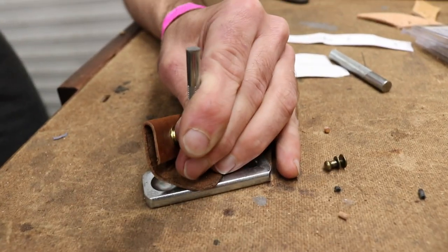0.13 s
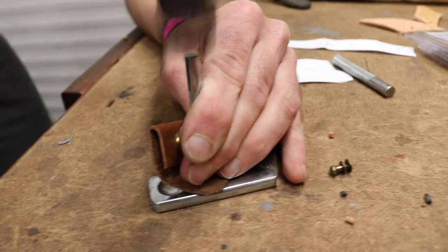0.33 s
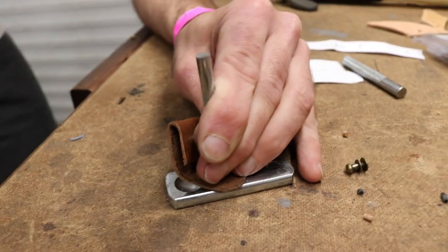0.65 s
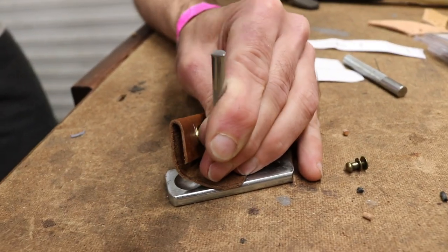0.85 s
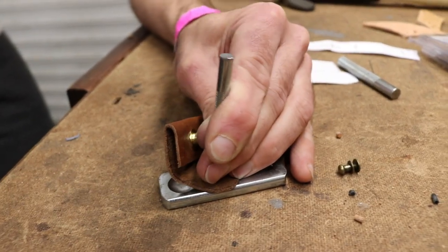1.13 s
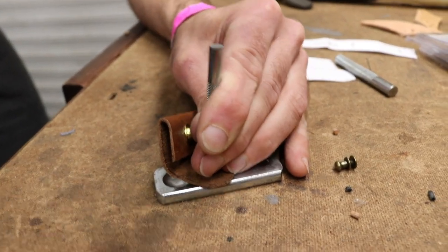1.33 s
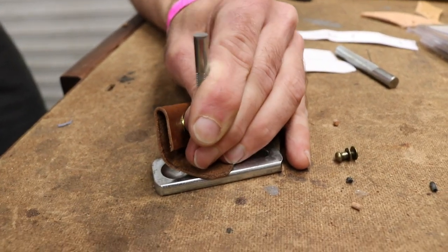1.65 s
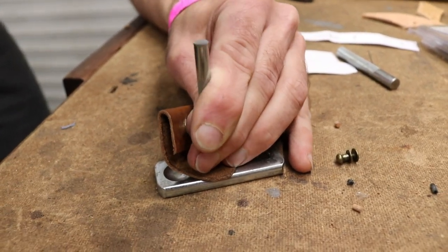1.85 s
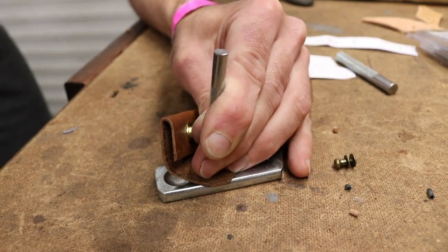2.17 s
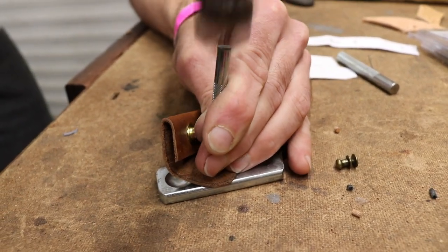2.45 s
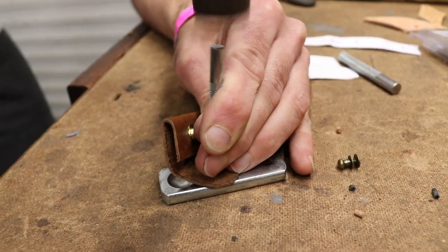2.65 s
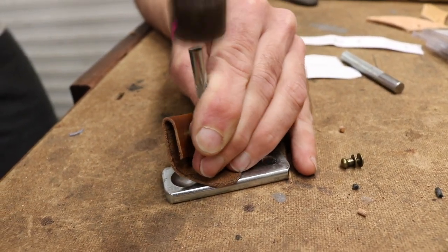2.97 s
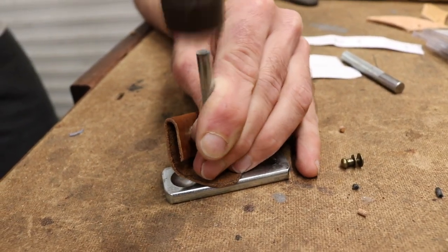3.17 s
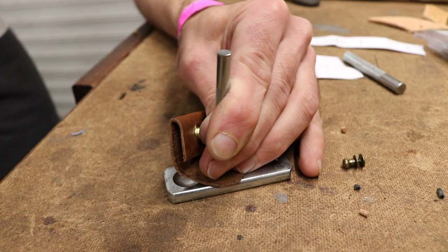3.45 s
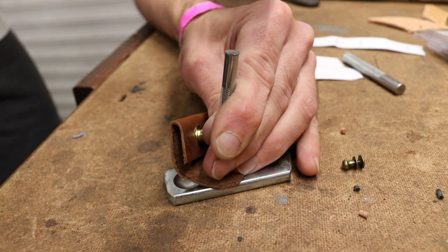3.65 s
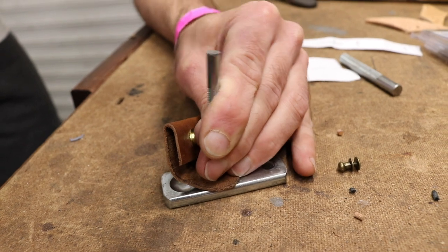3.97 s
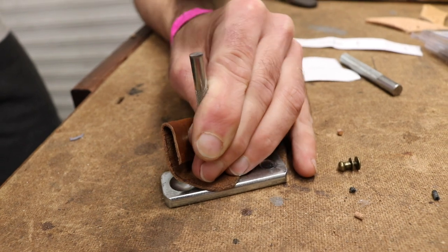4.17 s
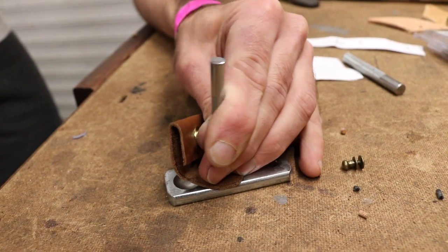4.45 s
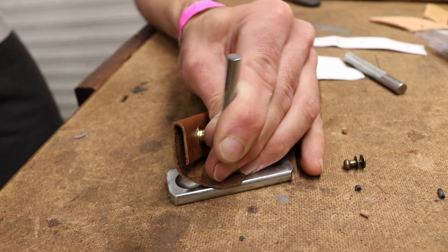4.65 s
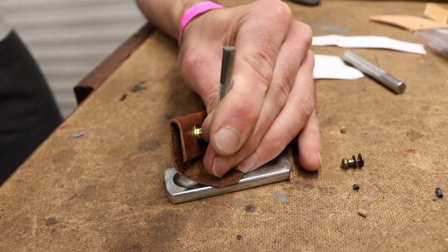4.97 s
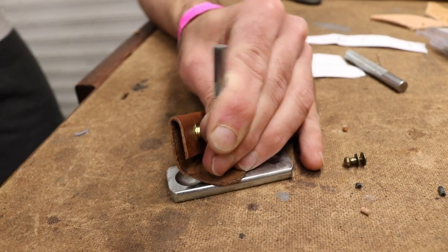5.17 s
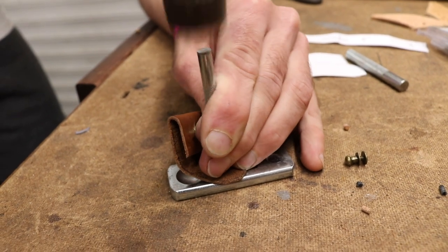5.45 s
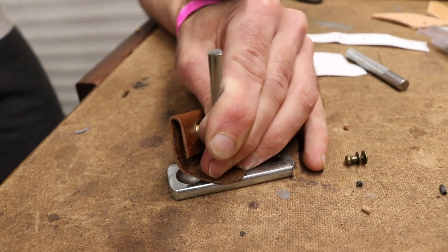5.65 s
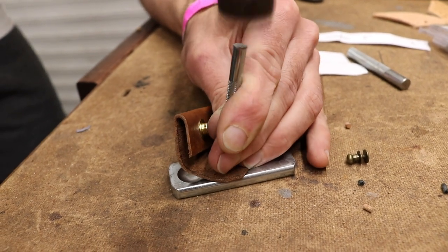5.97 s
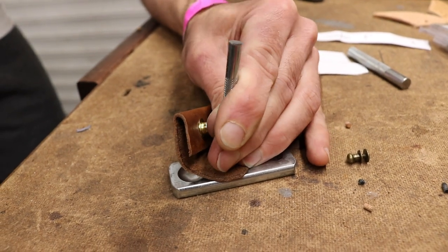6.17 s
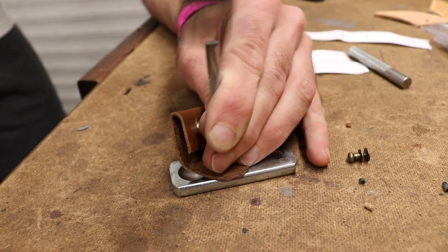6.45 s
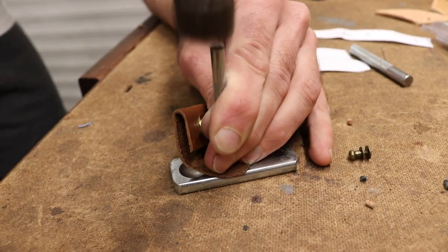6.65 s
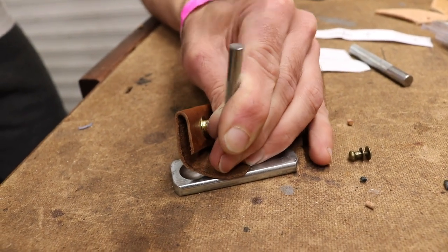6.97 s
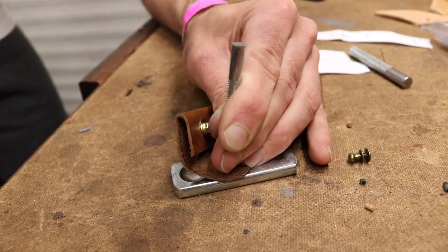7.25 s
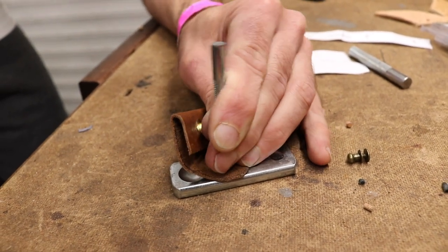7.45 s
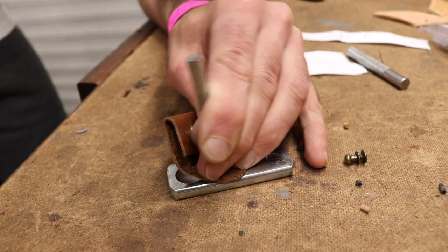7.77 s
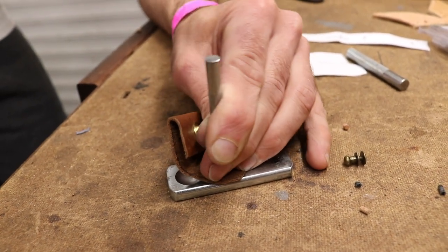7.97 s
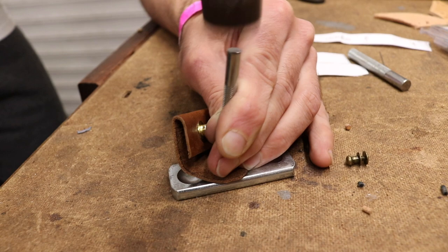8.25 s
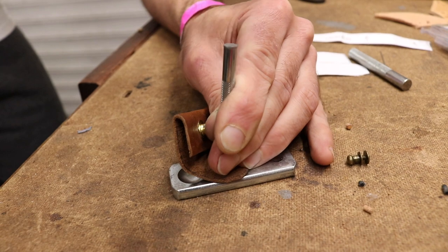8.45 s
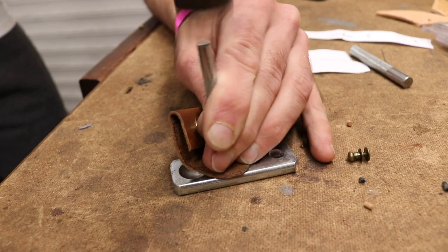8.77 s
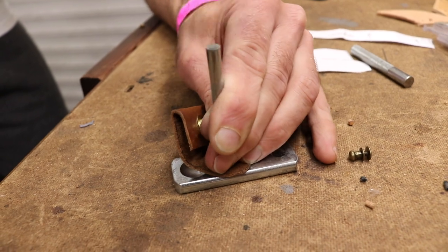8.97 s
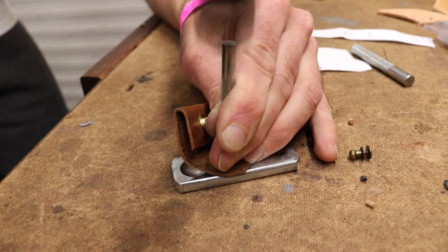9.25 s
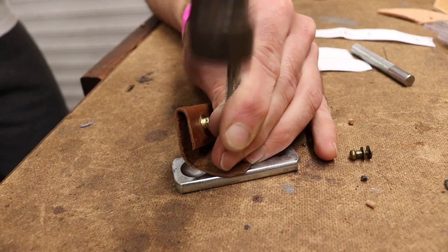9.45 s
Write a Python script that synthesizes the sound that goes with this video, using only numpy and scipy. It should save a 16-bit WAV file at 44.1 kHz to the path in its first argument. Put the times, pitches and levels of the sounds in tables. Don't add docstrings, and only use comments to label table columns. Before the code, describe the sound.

Continuous fast metal tapping, regular as a machine but each blow slightly different in brightness. Steel clicks on steel, a brass fastener snaps, the small anvil clacks and the fibreboard bench answers with a dry hollow thud. The microphone is very near and overloads a touch on strong blows. A small room adds a brief tail; faint low hum and hiss at the start sink away within a few seconds.

```python
import sys
import numpy as np
from scipy import signal
from scipy.fft import rfft, irfft
from scipy.io import wavfile

SR = 44100
rng = np.random.default_rng(int(sys.argv[2]) if len(sys.argv) > 2 else 0)


def to_wav(sig):
    pcm = np.clip(np.atleast_2d(sig), -1, 1) * 32767
    pcm = np.round(pcm).astype(np.int16)
    wavfile.write(sys.argv[1], SR, pcm.T)


def attenuation_scalar(level_db):
    decades = np.asarray(level_db, float) / 20
    return 10 ** decades


N = 424241


def taps():
    # [t/s, crispness of the blow, lean away, lean sideways]
    first_taps = [(0.0551, 1.5, -0.094, 1.8), (0.2339, 1.5, -0.79, 1.1), (0.4142, 1.5, -0.62, 0.81),
                  (0.5903, 1.5, 0.32, -1.3), (0.7637, 1.5, -0.56, -1.6), (0.9518, 2, 0.86, -2.6),
                  (1.1335, 1, 1.8, -0.35), (1.3044, 0.8, 0.65, -0.033), (1.4823, 0.7, -0.45, 0.38),
                  (1.6537, 1, -2.06, -1.1), (1.8356, 0.7, 0.017, -1.8), (2.0062, 0.7, -0.38, -2),
                  (2.188, 0.1, 0.99, 0.33), (2.3614, 0, 1.05, 0.6), (2.5318, 0.04, 0.76, 1.6),
                  (2.6968, 0, -0.55, 0.86), (2.8693, 0.5, -1.6, -0.46), (3.044, -0.7, 0.36, 0.063),
                  (3.2205, 0, -0.14, -1.9), (3.4015, 0.05, 1.5, -1.2), (3.5705, -0.26, 0.51, 0.19),
                  (3.7487, -0.2, 0.48, 0.75), (3.921, 0, -0.21, 0.66), (4.097, -0.16, -1.1, -0.47),
                  (4.2654, -0.6, -0.45, -0.29), (4.4373, -0.4, 1.3, 0.73), (4.6143, -0.7, 1.85, 0.85)]
    later_taps = [(4.7902, -0.48, 1.4, 1.4), (4.9653, -0.28, 0.7, 0.5), (5.1368, -0.17, -1.0, -0.6),
                  (5.3104, -0.4, -0.5, 0.5), (5.4901, -0.83, 0.5, 0.3), (5.6782, -0.032, 0.3, -1.6),
                  (5.8499, -0.3, 0, -0.1), (6.0193, 0.29, 0.7, 0), (6.1916, -0.2, 0.1, 1.3),
                  (6.3616, -0.41, -1.1, -1), (6.5368, -0.34, -0.5, 0.5), (6.7246, -0.69, 1.5, -1),
                  (6.8967, -0.75, 2.5, -0.3), (7.0747, 0.023, 1, -1.6), (7.2377, 0.034, 0.5, 0),
                  (7.4132, -0.35, -0.6, 1), (7.59, -0.34, -0.9, 0.5), (7.7609, -1.24, 1.3, 1.5),
                  (7.9411, -0.46, 0.7, -0.6), (8.127, -0.35, 0.1, -1), (8.2974, 0.1, 0.3, 0.4),
                  (8.4718, 0.12, -0.8, -0.65), (8.635, -0.73, -1, 0.3), (8.8083, -0.72, 0.1, 2),
                  (8.974, -0.88, 0.5, 2), (9.1517, -0.11, 0.5, 0.5), (9.3333, 0.63, -0.5, -0.7)]
    # [level/dB, dB per crispness, dB per lean away, dB per lean sideways]
    knock_law = (-16.5, 1, -0.11, 0)
    seat_law = (-15, -1, -1.4, 0.5)
    clack_law = (-17, -0.24, -4, 1.9)
    snap_law = (-11.5, 6.1, -2, -0.7)
    tick_law = (-17, 4, 1.98, 1.64)
    edge_law = (1, .3, -1.7, -2)
    # [f/Hz, Hz per crispness, Hz per lean away, Hz per lean sideways]
    spot_law = (9198.5, -58, -500, 349.5)
    # [f/Hz, level/dB, time to fall 60 dB/s, push 1 or pull -1]
    seat_modes = [(1424, -12, .05, -1), (1611, -12, .05, -1), (1701, -17, .05, -1), (1766, -4, .03, -1),
                  (1837, -14, .045, -1), (1962, -18, .045, -1), (2143, -9, .027, 1)]
    anvil_modes = [(2648, -9, .024, -1), (2790, -12, .02, -1), (2926, -7, .019, 1), (3049, -8, .018, 1),
                   (3352, -11, .016, 1), (3429, -16, .028, -1), (3717, -17, .023, 1), (4030, -13, .012, 1),
                   (4299, -11, .008, -1), (4496, -13, .007, -1)]
    # [f/Hz, level/dB]
    snap_colour = [(1500, -31), (2300, -14), (3600, 1.5), (4400, -1.5), (5400, -4), (7000, -34)]
    crisp_in_room = .1

    knocks, direct, spread = np.zeros((3, N))
    bench = knock()
    seat = mode_waves(seat_modes, .08)
    anvil = mode_waves(anvil_modes, .06)
    laws = np.array([knock_law, seat_law, clack_law, snap_law, tick_law, edge_law, spot_law])
    for s, crispness, *lean in first_taps + later_taps:
        blow_db, seat_db, clack_db, snap_db, tick_db, edge_db, tick_hz = laws @ [1, crispness, *lean]
        add(knocks, s, attenuation_scalar(blow_db) * ring(bench, .45))
        add(direct, s - .00026, attenuation_scalar(blow_db + seat_db - 2.6) * ring(seat, 1.5))
        add(direct, s - .00019, attenuation_scalar(blow_db + clack_db - 2.1) * ring(anvil, 2.1))
        snap = rattle(lambda f: read(snap_colour, f), 0.00025, 0.0011)
        add(direct, s - .0003, attenuation_scalar(blow_db + snap_db + 26) * snap)
        add(direct, s - .0007, attenuation_scalar(blow_db + tick_db - 0.14) * tick(tick_hz, edge_db))
        ping = punch(ringing(s))
        add(direct, s - .0003, ping)
        add(spread, s, attenuation_scalar(15) * ping)

        seat_db, clack_db, _, tick_db = laws[1:5] @ [1, crisp_in_room * crispness, *lean]
        room_colour = [
            (1000, 0.2 * clack_db - 4),
            (1800, 0.51 * seat_db - 3.5),
            (3500, 0.95 * clack_db - 2),
            (tick_hz - 1500, 0.4 * tick_db - 9.5),
            (tick_hz, 0.72 * tick_db - 1.5),
            (tick_hz + 1500, 0.13 * tick_db - 9),
            (14000, 0.23 * tick_db - 13.0),
        ]
        add(spread, s, attenuation_scalar(blow_db + 33.5) * rattle(lambda f: read(room_colour, f), 0.00025, .0016))
    return knocks, direct, spread


def tick(hz, edge_db, width_hz=900, peak_db=9, edge_hz=12000):
    # [f/Hz, level/dB]
    tick_colour = [(2000, -23.5), (4000, -4), (5200, -15), (6200, -9), (7000, -5), (9500, -8.5),
                   (11500, -10), (13500, -12), (15000, -11.5), (16500, -20.5)]

    def colour_db(f):
        bright_spot = peak_db * np.exp(-((f - hz) / width_hz) ** 2)
        return read(tick_colour, f) + bright_spot + edge_db * (f > edge_hz)

    burst = rattle(colour_db, .0006, 0.0011)
    return burst / np.sqrt(np.sum(burst ** 2) / 560)


def knock():
    # [f/Hz, level/dB, time to fall 60 dB/s]
    push_modes = [(82, -51.1, 0.25), (121, -41.5, 0.222), (149, -35.6, 0.109), (230, -25.8, 0.065),
                  (267, -47.4, 0.182), (312, -47.8, 0.25), (471, -33.4, 0.11), (546, -41.1, 0.234),
                  (626, -37.6, 0.175), (642, -27.8, 0.104), (767, -13.1, 0.028), (1121, -22.7, 0.037),
                  (1221, -26.9, 0.031), (1333, -26.3, 0.034), (1410, -47.0, 0.054)]
    pull_modes = [(192, -49.3, 0.25), (367, -33.4, 0.123), (417, -38.6, 0.25), (515, -15.4, 0.049),
                  (566, -11.1, 0.027), (657, -19.3, 0.042), (743, -38.7, 0.094), (817, -37.4, 0.196),
                  (867, -18.4, 0.05), (911, -52.4, 0.25), (975, -38.7, 0.173), (999, -49.1, 0.25),
                  (1064, -34.9, 0.054), (1092, -41.3, 0.136)]
    # [f/Hz, level/dB, time to fall 60 dB/s, weight:
    frame_modes = [(58, -50, 0.16, 0.86), (87, -56, .4, 0.75), (122.2, -50.5, 0.33, 0.65),
                   (149, -49.5, 0.21, 0.17), (417, -48, 0.27, -0.85), (538, -55, 0.65, 1),
                   (810, -57, 0.41, 0.98), (1015, -57.5, .3, -0.53), (1164, -54.5, 0.12, 0.88)]
    pushing = [(*mode, 1) for mode in push_modes]
    pulling = [(*mode, -1) for mode in pull_modes]
    waves = mode_waves(pushing + pulling + frame_modes, .4)
    cushion = np.hanning(13)[None]
    return signal.oaconvolve(waves, cushion / cushion.sum(), "same")


def punch(levels_db, beat_hz=16, depth=.6):
    # [f/Hz, time to fall 60 dB/s, level/dB]
    punch_modes = [(11850, .1, -4), (13320, .035, 0), (6700, .03, -3)]
    t = np.arange(SR // 5) / SR
    ringing_sum = 0
    chances = rng.random((len(punch_modes), 2))
    for (hz, t60, mode_db), db, (phase, quicker) in zip(punch_modes, levels_db, chances):
        beating = 1 + depth * np.cos(2 * np.pi * beat_hz * (1 + quicker) * t)
        pair = np.sin(2 * np.pi * (hz * t + phase)) * beating
        ringing_sum = ringing_sum + attenuation_scalar(db + mode_db + 11.5 - 60 * t / t60) * pair
    return ringing_sum


def ringing(s):
    # [t/s, then level/dB of each of the three punch modes]
    clear_pings = [(0.06, -64.5, -59.5, -58.5), (0.23, -62.5, -72, -51.5), (0.59, -69.0, -60.0, -62),
                   (0.76, -65, -66.5, -65), (1.3, -55, -69, -69), (2.01, -62, -59, -53.5),
                   (2.36, -68.0, -64, -56), (2.7, -70, -56, -59), (3.22, -57.5, -70, -55.5),
                   (3.4, -52, -56, -56.5), (3.57, -67, -54.5, -66), (4.44, -55, -74.5, -61),
                   (4.79, -79, -57.5, -63), (5.14, -62.5, -58.5, -59.5), (5.49, -78, -70, -65),
                   (5.68, -52, -79, -54), (5.85, -64, -61.5, -58), (6.54, -57, -75, -78),
                   (6.72, -56, -53, -59), (6.9, -52, -71, -62), (7.07, -71.5, -57, -62),
                   (7.59, -65.5, -75, -57.5), (7.94, -52, -59, -55), (8.13, -60, -60, -54),
                   (8.3, -64, -54, -61), (8.64, -63.5, -66, -56.5), (8.97, -51, -76, -56.5),
                   (9.33, -58, -61, -50.5)]
    damped_levels = (-70.5, -68.5, -63.5)
    near = [levels for at, *levels in clear_pings if abs(at - s) < .05]
    return near[0] if near else damped_levels


def ring(waves, spread_db):
    return attenuation_scalar(spread_db * rng.standard_normal(len(waves))) @ waves


def mode_waves(modes, length_s):
    hz, db, t60, sign = np.transpose(modes)[:, :, None]
    t = np.arange(round(length_s * SR)) / SR
    waves = sign * attenuation_scalar(db - 60 * t / t60) * np.sin(2 * np.pi * hz * t)
    return waves / np.sqrt(np.mean(waves.sum(0)[:560] ** 2))


def rattle(db_at, rise_s, fall_s):
    t = np.arange(256) / SR
    shape = np.minimum(t / rise_s, 1) ** 2 * np.exp(-t / fall_s)
    colour = attenuation_scalar(db_at(np.fft.rfftfreq(len(t), 1 / SR)))
    burst = rng.standard_normal(len(t)) * np.sqrt(shape)
    for _ in range(4):
        z = rfft(burst)
        burst = irfft(z / (abs(z) + 1e-12) * colour) * np.sqrt(shape)
    return burst * np.sqrt(np.mean(colour ** 2) / np.sum(burst ** 2))


def echoes(t60_table, colour, gap_s):
    sparse = np.zeros(SR // 2)
    at = np.arange(0, len(sparse) - 12, 12)
    sparse[at + rng.integers(0, 12, len(at))] = rng.choice([-1., 1.], len(at))
    hz, t, z = signal.stft(sparse, SR, nperseg=128)
    t60 = read(t60_table, hz)[:, None]
    fading = attenuation_scalar(read(colour, hz)[:, None] - 60 * t / t60)
    z = z * fading / np.sqrt(t60 * SR / 12 / np.log(1e6))
    gap = np.zeros(round(gap_s * SR))
    return np.r_[gap, signal.istft(z, SR, nperseg=128)[1]]


def air():
    # [f/Hz, level per Hz/dB]
    hum_colour = [(88, -26.5), (125, -1), (439, -5), (805, -33.5), (979, -24.5), (1170, -33), (1560, -25),
                  (13400, -48), (16000, -50)]
    # [t/s, level/dB]
    hum_level = [(0, -54), (0.498, -58), (1, -58), (1.502, -67), (2.501, -69.5), (4, -84), (9.62, -86.5)]
    # [f/Hz, level per Hz/dB]
    left_colour = [(25, -16), (55, 3), (85, -4), (125, -11.5), (300, -27.5), (530, -22), (900, -34),
                   (2500, -43.5), (12500, -44.5), (15000, -57.5)]
    settling = evened(coloured(rng.standard_normal(N), lambda f: read(hum_colour, f)))
    steady = evened(coloured(rng.standard_normal(N), lambda f: read(left_colour, f)))
    settling_db = np.interp(np.arange(N) / SR, *np.transpose(hum_level))
    return settling * attenuation_scalar(settling_db) + steady * attenuation_scalar(-71)


def coloured(x, db_at):
    return irfft(rfft(x) * attenuation_scalar(db_at(np.fft.rfftfreq(len(x), 1 / SR))), len(x))


def evened(x):
    return x / np.sqrt(np.mean(x ** 2) + 1e-20)


def read(points, hz):
    f, value = np.transpose(points)
    return np.interp(np.log(hz + 1), np.log(f + 1), value)


def add(mix, s, sound):
    part = mix[round(s * SR):][:len(sound)]
    part += sound[:len(part)]


def scene():
    # [f/Hz, time to fall 60 dB/s]
    clutter_t60 = [(1310, 0.048), (4000, 0.045), (8000, 0.022), (15000, 0.023)]
    walls_t60 = [(60, .5), (130, .4), (400, .28), (1500, .25), (4000, .25), (6000, .28), (9000, .27),
                 (15000, .23)]
    # [f/Hz, level/dB]
    clutter_colour = [(800, -44), (1250, -16), (1700, -3.5), (2300, -2.5), (3000, -14), (5500, -14),
                      (8000, -16.5), (12000, -21.5), (16000, -23.5)]
    walls_colour = [(900, -36), (1300, -9), (2000, -19), (2700, -11), (3600, -18), (5500, -28.5),
                    (8000, -27), (12000, -33), (16000, -34)]
    boom_colour = [(40, -14.5), (60, -6), (120, -17), (250, -20), (500, -25.5), (900, -16.5), (1300, -16.5),
                   (1700, -9), (2500, -21.5)]
    knocks, steel, spread = taps()
    boom = signal.oaconvolve(knocks, echoes(walls_t60, boom_colour, 0.00488))[:N]
    clutter = signal.oaconvolve(spread, echoes(clutter_t60, clutter_colour, 0.0007974))[:N]
    walls = signal.oaconvolve(spread, echoes(walls_t60, walls_colour, 0.0039))[:N]
    return (knocks + steel + boom + clutter + walls + air())[None]


def top_cut(x):
    return signal.sosfilt(signal.butter(12, 17150, fs=SR, output="sos"), x)


def record(dry):
    overload = .415
    cut = signal.sosfilt(signal.butter(2, 70, "high", fs=SR, output="sos"), dry)
    knee = cut / (1 + abs(cut / overload) ** 8) ** (1 / 8)
    edge = signal.oaconvolve(knee, signal.firwin(63, 16200, fs=SR)[None], "same")
    return top_cut(edge)


dry = scene()
out = record(dry)
to_wav(out)
```